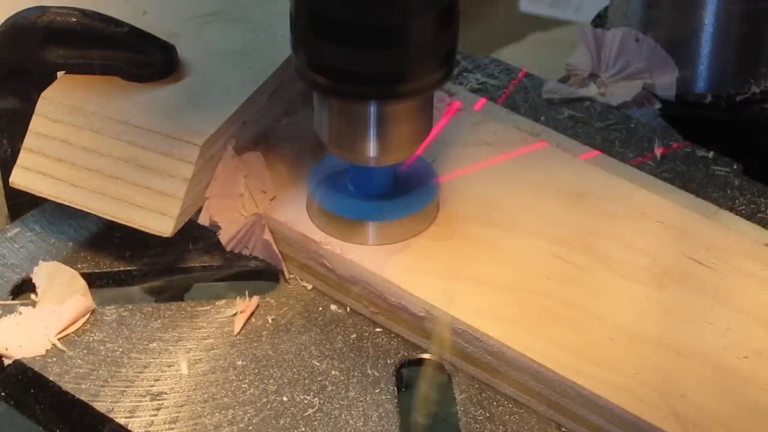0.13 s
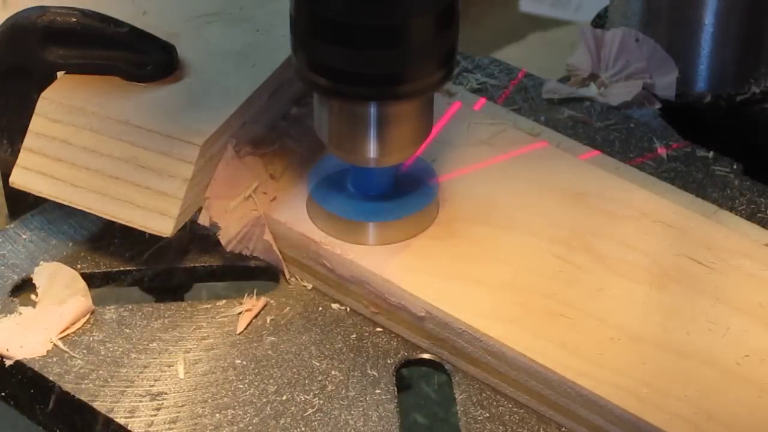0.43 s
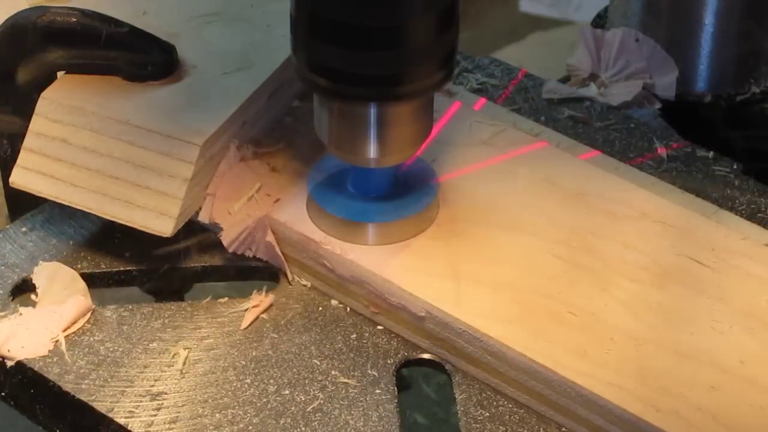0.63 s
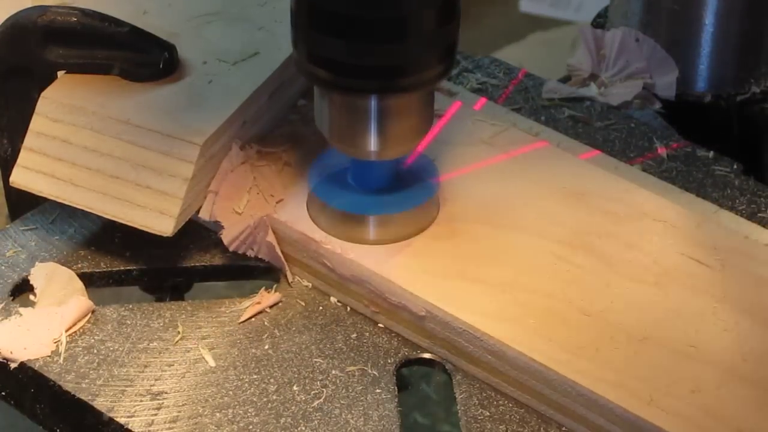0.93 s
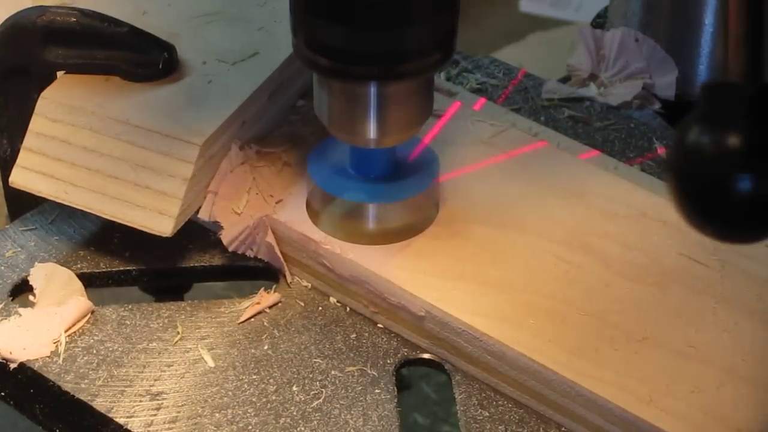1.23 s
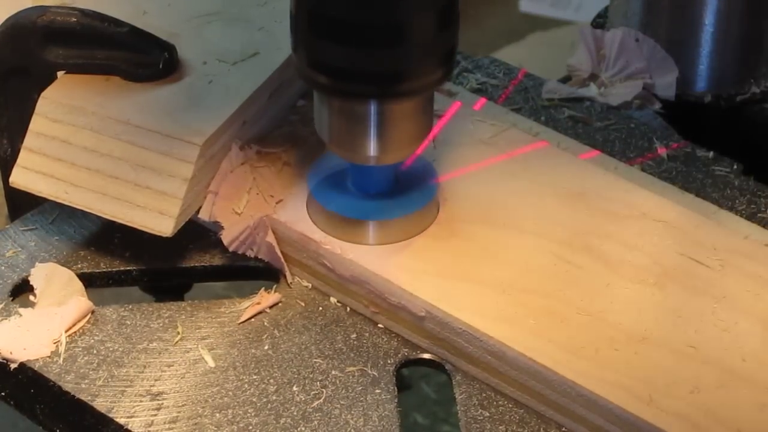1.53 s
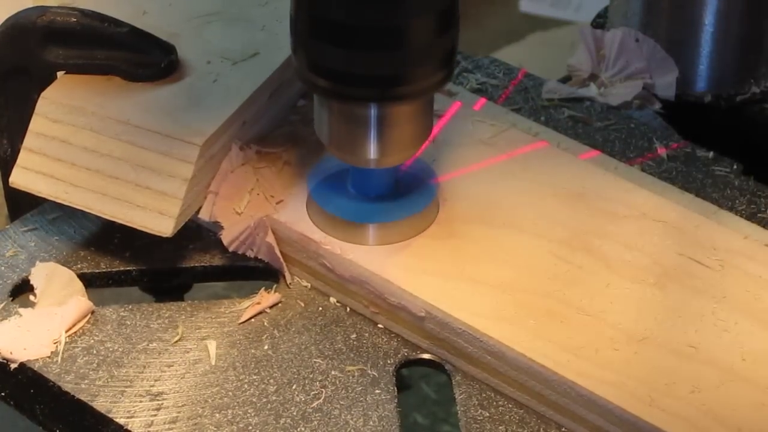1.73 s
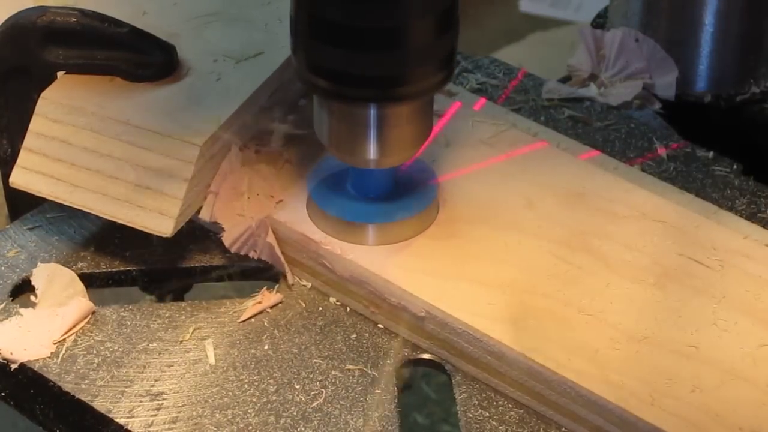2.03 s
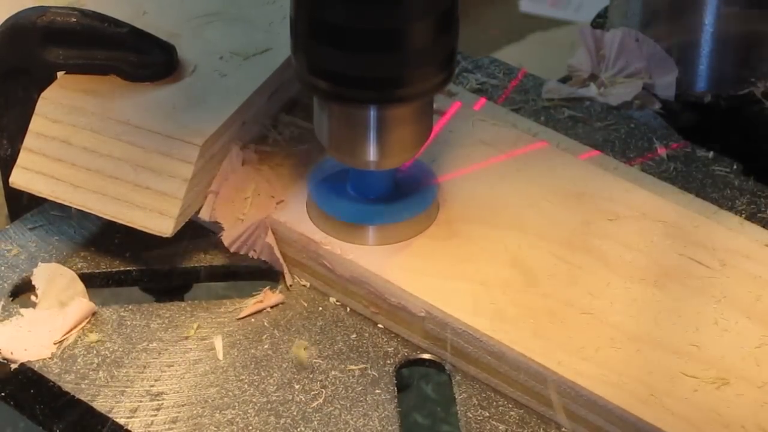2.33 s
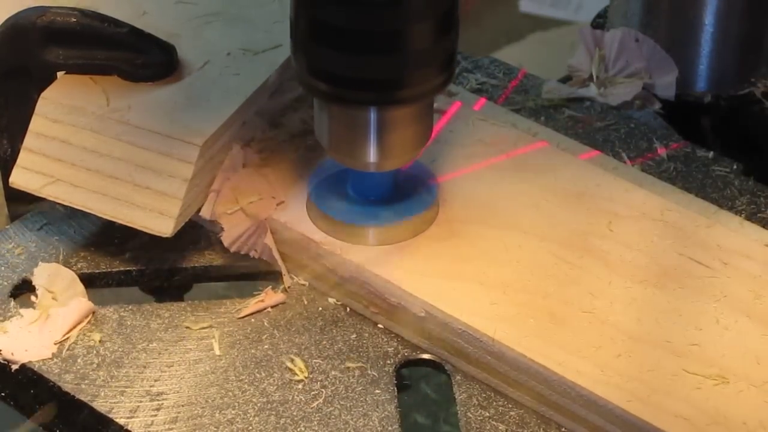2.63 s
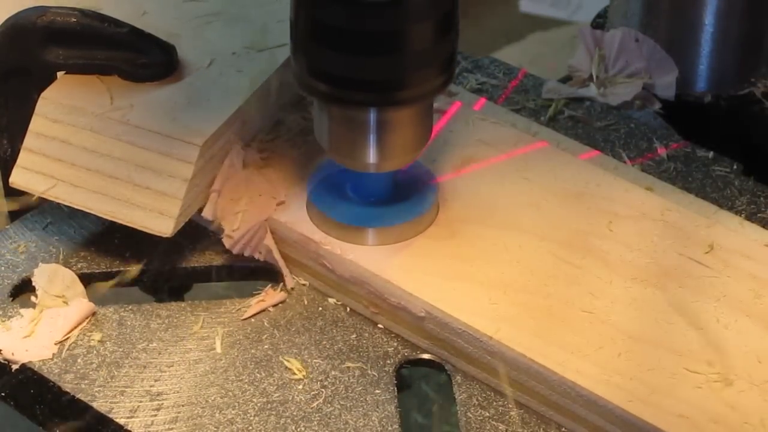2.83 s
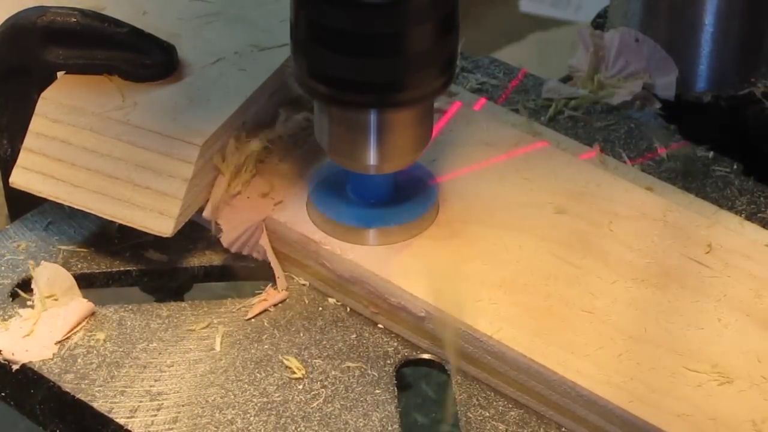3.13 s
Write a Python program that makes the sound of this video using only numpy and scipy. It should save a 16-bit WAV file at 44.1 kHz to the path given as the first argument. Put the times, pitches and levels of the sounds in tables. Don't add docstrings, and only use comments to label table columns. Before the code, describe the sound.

Close, slightly overloaded sound of a wide drill bit cutting wood: harsh fluttering rasp and thin squeals, a brief drop to humming motor, light hissing brushes, then a clattering landing and steady rough cutting in a small room.

```python
import sys
import numpy as np
from scipy import signal
from scipy.fft import rfft, irfft
from scipy.io import wavfile
from scipy.ndimage import uniform_filter1d

SR = 44100
rng = np.random.default_rng(int(sys.argv[2]) if len(sys.argv) > 2 else 0)


def output_pcm(signal):
    pcm = np.clip(np.atleast_2d(signal).T, -1, 1) * 32767
    wavfile.write(sys.argv[1], SR, np.round(pcm).astype(np.int16))


def attenuation_scalar(level_db):
    decades = np.asarray(level_db, float) / 20
    return 10 ** decades


N = 145530

# time in seconds, cutting level in dB.
FEED_PRESSURE = [(0, -23), (.5, -23), (.855, -23), (.88, -30), (.99, -33.5), (1.02, -53), (1.38, -50),
                 (1.4, -53), (1.66, -33), (1.68, -22), (1.8, -23), (2.4, -22.5), (3.3, -23)]
# time in seconds, lag behind a steady pace in grain crossings.
SPINDLE_LAG = [(0, .15), (.075, .05), (.225, -.38), (.375, -.52), (.525, -.59), (.675, -.7), (.83, -.82),
               (1.66, -2.8), (1.87, -3.06), (2.02, -3.13), (2.2, -3.15), (2.5, -3.13), (2.9, -3.04),
               (3.3, -2.99)]
# time in seconds, burst height in dB.
GRAIN_CATCH = [(0, 4), (.3, 4), (.55, 4), (.85, 3), (1.4, 8), (1.66, 5), (1.75, 3), (1.9, 6.5), (2.1, 7),
               (3.3, 6.5)]
# frequency in Hz, level in dB per Hz.
TEAR_COLOUR = [(300, -60), (900, -5), (1450, -15), (2160, -1), (5500, -3), (7000, -9.5), (12000, -23),
               (15900, -39)]
# frequency in Hz, width in Hz, level in dB.
BIT_RINGS = [(1290, 110, -0.5), (1623, 48, -1.5), (2080, 380, 2), (2890, 170, -2.5), (3267, 270, 1),
             (3840, 27, 1.5), (4330, 130, 2.5), (5535, 520, 6), (7520, 50, -3), (9600, 530, -7.5),
             (11300, 430, -5.5), (12200, 740, -6)]
# time in seconds, peak in dB.
SNAPS_BEFORE_LIFT = [(0.0214, -3.5), (0.0425, -11), (0.067, -7), (0.0837, -6.5), (0.1236, -9), (0.1655, -8),
                     (0.196, -11), (0.2114, -6), (0.2583, -8.5), (0.2748, -6), (0.301, -6), (0.3209, -2),
                     (0.3436, -19), (0.3674, -1.5), (0.39, -7.5), (0.41, -6), (0.4357, -8), (0.454, -4),
                     (0.4743, -8.5), (0.4983, -6), (0.521, -4.5), (0.5442, -11), (0.567, -14),
                     (0.5911, -7.5), (0.6322, -8.5), (0.6546, -8), (0.6778, -8), (0.7008, -11), (0.74, -8),
                     (0.7871, -16), (0.8084, -8.5), (0.8324, -13)]
# time in seconds, peak in dB.
LANDING_CHATTER = [
    (1.6735, -7),
    (1.681, -18),
    (1.688, -7),
    (1.696, -16),
    (1.703, -5),
    (1.718, -7),
    (1.725, -8),
]
# time in seconds, peak in dB.
SNAPS_ON_REENTRY = [(1.753, -6), (1.791, -13), (1.8108, -9), (1.8346, -10), (1.8556, -7), (1.875, -18),
                    (1.8984, -5), (1.9204, -20), (1.942, -9), (1.9646, -5.5), (1.9887, -10), (2.01, -6),
                    (2.0324, -10), (2.054, -2), (2.0766, -9), (2.099, -7), (2.121, -2), (2.143, -6),
                    (2.1636, -9), (2.1876, -8), (2.2098, -5.5), (2.2273, -11), (2.2522, -6), (2.2751, -3),
                    (2.2986, -7), (2.321, -7.5), (2.346, -12), (2.369, -14), (2.391, -7), (2.4093, -14),
                    (2.4343, -9), (2.4567, -9), (2.4773, -15)]
# time in seconds, peak in dB.
SNAPS_DEEP_IN_CUT = [(2.478, -22), (2.503, -11), (2.5217, -14), (2.545, -7), (2.568, -3), (2.5911, -13),
                     (2.613, -7), (2.6365, -11), (2.6573, -2.5), (2.6795, -7.5), (2.7033, -7), (2.7258, -8),
                     (2.7476, -8), (2.771, -6), (2.7914, -7), (2.8149, -3.5), (2.837, -6), (2.861, -9),
                     (2.8826, -5.5), (2.9044, -10), (2.9276, -8.5), (2.9503, -14), (2.9735, -6),
                     (2.995, -7), (3.0166, -3), (3.038, -5), (3.062, -10), (3.0859, -10), (3.1046, -6),
                     (3.129, -8), (3.152, -8), (3.1738, -8), (3.1977, -5.5), (3.2193, -12), (3.2391, -9),
                     (3.2675, -14)]
# frequency in Hz, level in dB.
SNAP_COLOUR = [(900, -15), (2000, -1.5), (6000, -0.5), (8000, -4), (13000, -4)]
# frequency in Hz, level in dB.
BOARD_COLOUR = [(60, -50), (110, -49), (200, -21), (350, -2), (700, -4), (1200, -8.5), (2000, -6.5),
                (4000, -47)]
# start and end in seconds, pitch in Hz, dB against the cut.
RIM_SQUEALS = [
    (0, .13, 9010, -17),
    (.6, .66, 10850, -17),
    (.7, .77, 10850, -18),
    (.84, .93, 10850, -17),
    (.55, .9, 11800, -19),
    (0, .97, 7450, -18),
    (.645, .652, 9400, -12),
    (.962, .968, 9400, -4),
    (1.39, 1.5, 7300, -5),
    (1.5, 1.62, 7300, -15),
]
# time in seconds, peak in dB.
RIM_RUBS = [(0.9617, -25), (0.9774, -34), (1.0024, -36), (1.132, -31), (1.1917, -36), (1.281, -32),
            (1.3798, -38), (1.3917, -27.5), (1.4122, -29), (1.434, -24), (1.4546, -28), (1.461, -33),
            (1.4772, -27), (1.491, -35), (1.4994, -33), (1.5085, -35), (1.5184, -28), (1.533, -22),
            (1.552, -31), (1.5624, -28), (1.5754, -25), (1.594, -31), (1.6048, -33), (1.6182, -27),
            (1.6382, -31), (1.6587, -27)]
# frequency in Hz, level in dB.
RUB_COLOUR = [(400, -30), (1500, 13.5), (4000, 13), (7000, 3.5), (11000, 1.5), (14000, -9), (16000, -16)]
# start in seconds, length in seconds, pitch in Hz, level in dB.
BOARD_GROANS = [
    (0.598, 0.057, 1190, -24.5),
    (.72, .1, 950, -29),
    (1.784, .13, 385, -27.5),
    (2.526, .05, 1200, -27),
]
# time in seconds, level in dB.
MOTOR_LEVEL = [(0, -26.5), (.15, -31), (.5, -28), (.85, -24), (.97, -18.5), (1.1, -20), (1.2, -21),
               (1.3, -20), (1.42, -21), (1.52, -20), (1.58, -23), (1.65, -21), (1.75, -24.5), (2.05, -33),
               (2.55, -27.5), (2.65, -29.5), (3.3, -29.5)]
# frequency in Hz, level in dB per Hz.
ROAR_COLOUR = [(15, -76), (25, -42.5), (426, -5.5), (500, -4), (1010, -17), (1360, -15), (2040, -24),
               (4460, -34.5), (15900, -56)]
# frequency in Hz, width in Hz, level in dB.
CASING_RINGS = [(171.5, 34, -13.5), (261, 6.2, -18.5), (329.5, 27, -7), (369.5, 70, 0), (415.4, 19, -10.5),
                (580, 40, -10), (642, 36, -11), (780.5, 12, -9), (839, 77, -6.5), (2470, 240, -16),
                (3390, 780, -11), (4320, 810, -13.5)]
# frequency in Hz, rms level in dB.
HUM_LINES = [(120, -56), (479.5, -25), (720, -34.5), (1250, -39), (1371, -32.5), (1491, -46), (3345, -45)]
# frequency in Hz, width in Hz, dB against the motor.
TABLE_SHUDDER = [(157.8, 5.2, -19), (250.7, 16, -26)]
# frequency in Hz, level in dB.
MIC_RESPONSE = [(20, -7), (105, -6), (125, 0.5), (14000, -3.5), (15900, -9)]


def evened(x):
    return x / np.sqrt(np.mean(x ** 2) + 1e-20)


def curve(points):
    return np.interp(np.arange(N) / SR, *np.transpose(points))


def colour(x, points):
    f, db = np.transpose(points)
    hz = np.fft.rfftfreq(len(x), 1 / SR)
    gain = attenuation_scalar(np.interp(np.log(hz + 1), np.log(f + 1), db))
    return irfft(rfft(x) * gain, len(x))


def ring(x, hz, width):
    r = np.exp(-np.pi * abs(width) / SR)
    pole = r * np.exp(2j * np.pi * hz / SR)
    return 2 * signal.lfilter([1 - r], [1, -pole], x + 0j).real


def double_ring(x, hz, width):
    return evened(ring(ring(x, hz, width), hz, width))


def wander(rate):
    t = np.arange(N) / SR
    drift = np.zeros(N)
    for f in np.geomspace(.05, 1, num=16):
        drift += np.sin(2 * np.pi * (rate * f * t + rng.random())) / np.sqrt(f)
    return evened(drift)


def bursts(table, shape):
    train = np.zeros(N)
    for s, db in table:
        train[np.clip(round(s * SR), 0, N - 1)] = attenuation_scalar(db)
    return signal.oaconvolve(train, shape)[:N] * rng.standard_normal(N)


def edge_force(turn, chance):
    sharpness, skew, vary_db, jitter = 1.5, -.15, .7, .02
    crossing = np.clip(turn, 0, None).astype(int)
    u = turn % 1 - .5 + jitter * chance[crossing, 0]
    bite = np.exp(-sharpness * (1 - np.cos(2 * np.pi * u))) * (1 + skew * np.tanh(4 * u))
    force = attenuation_scalar((curve(GRAIN_CATCH) + vary_db * chance[crossing, 1]) * bite)
    return force / np.sqrt(uniform_filter1d(force ** 2, size=3 * SR // 45))


def tearing_fibres():
    fibres_per_s, spread_db, scrape_share = 6000, 2.6, .55
    strength = attenuation_scalar(spread_db * np.minimum(rng.exponential(1, N), 5))
    fibres = strength * (rng.random(N) < fibres_per_s / SR)
    return evened(fibres * rng.choice([-1., 1.], N)) + scrape_share * rng.standard_normal(N)


def snapping():
    lead_s, peak_s = .008, .0018
    rise_s, fall_s, trim_db = .0023, .0021, -9.5
    crack_s, crack_share = .0004, .7
    t = np.arange(900) / SR - lead_s
    swell = np.exp(np.minimum(t / rise_s, -t / fall_s))
    shape = attenuation_scalar(trim_db) * (swell + crack_share * np.exp(-abs(t) / crack_s))
    snaps = SNAPS_BEFORE_LIFT + LANDING_CHATTER + SNAPS_ON_REENTRY + SNAPS_DEEP_IN_CUT
    return colour(bursts([(s + peak_s - lead_s, db) for s, db in snaps], shape), SNAP_COLOUR)


def grinding():
    level = attenuation_scalar(-8.5 + 0.5 * wander(11.0))
    return level * attenuation_scalar(curve(FEED_PRESSURE)) * evened(colour(rng.standard_normal(N), BOARD_COLOUR))


def cutting():
    crossings_per_s, colour_vary_db, rings_db = 44.7, 4.5, -3
    turn = crossings_per_s * np.arange(N) / SR - curve(SPINDLE_LAG) + .5
    count = np.arange(int(turn.max()) + 3)
    chance = rng.standard_normal((len(count), 2 + len(BIT_RINGS)))
    tear = evened(edge_force(turn, chance) * tearing_fibres())
    drive = attenuation_scalar(curve(FEED_PRESSURE)) * tear + snapping()
    body = np.zeros(N)
    for j, (hz, width, db) in enumerate(BIT_RINGS):
        vary = np.interp(turn, count + .5, chance[:, 2 + j])
        body += attenuation_scalar(db + colour_vary_db * vary) * ring(drive, hz, width) * np.sqrt(200 / abs(width))
    cut = evened(colour(drive, TEAR_COLOUR)) + attenuation_scalar(rings_db) * evened(body)
    return np.std(drive) * cut + grinding()


def squealing():
    width_hz, waver_db, fade_s = 150, 2.5, .012
    t, noise = np.arange(N) / SR, rng.standard_normal(N)
    squeals = np.zeros(N)
    for start, end, hz, db in RIM_SQUEALS:
        fade = np.clip(np.minimum(t - start + fade_s, end + fade_s - t) / fade_s, 0, 1)
        squeals += fade * attenuation_scalar(db + waver_db * wander(50.)) * double_ring(noise, hz, width_hz)
    return attenuation_scalar(curve(FEED_PRESSURE)) * squeals


def rubbing():
    length_s, lead_s, trim_db = .008, .0019, -4
    rim_hz, rim_width_hz, rim_db, sings_from_s = 7300, 90, 11, 1.38
    t = np.arange(900) / SR
    shape = attenuation_scalar(trim_db) * np.sin(np.pi * np.minimum(t / length_s, 1)) ** 2
    puffs = bursts([(s - lead_s, db) for s, db in RIM_RUBS], shape)
    late_puffs = puffs * (np.arange(N) > sings_from_s * SR)
    return colour(puffs, RUB_COLOUR) + attenuation_scalar(rim_db) * ring(late_puffs, rim_hz, rim_width_hz)


def groaning():
    t, noise = np.arange(N) / SR, rng.standard_normal(N)
    groans = np.zeros(N)
    for start, length, hz, db in BOARD_GROANS:
        swell = np.sin(np.pi * np.clip((t - start) / length, 0, 1))
        groans += attenuation_scalar(db) * swell * double_ring(noise, hz, 350)
    return groans


def motor_roar(drive):
    casing_db, lumpy_db = -3.5, 1.8
    casing = np.zeros(N)
    for hz, width, db in CASING_RINGS:
        casing += attenuation_scalar(db + lumpy_db * wander(16.)) * double_ring(drive, hz, 1.36 * width)
    return evened(evened(colour(drive, ROAR_COLOUR)) + attenuation_scalar(casing_db) * evened(casing))


def motor_hum():
    t = np.arange(N) / SR
    hum = np.zeros(N)
    for hz, db in HUM_LINES:
        hum += np.sqrt(2) * attenuation_scalar(db + .6 * wander(12.8)) * np.sin(2 * np.pi * (hz * t + rng.random()))
    return hum


def table_shudder(drive):
    t = np.arange(N) / SR
    tone_share = 1.4
    shudder = np.zeros(N)
    for hz, width, db in TABLE_SHUDDER:
        shudder += attenuation_scalar(db) * (evened(ring(drive, hz, width)) + tone_share * np.sin(2 * np.pi * hz * t))
    return shudder


def motor():
    idle_from_s, idle_to_s, idle_fade_s = .96, 1.705, .04
    loaded_hum_db, hum_ref_db, shudder_top_db = -7, -21, -28.5
    t, level_db = np.arange(N) / SR, curve(MOTOR_LEVEL)
    drive = rng.standard_normal(N) * attenuation_scalar(0.95 * wander(37))
    loaded = np.clip(.5 - np.minimum(t - idle_from_s, idle_to_s - t) / idle_fade_s, 0, 1)
    hum = attenuation_scalar(loaded_hum_db * loaded - hum_ref_db) * motor_hum()
    shudder = attenuation_scalar(np.minimum(level_db, shudder_top_db)) * loaded * table_shudder(drive)
    return attenuation_scalar(level_db) * (motor_roar(drive) + hum) + shudder


def workshop(x):
    t60_s, first_echo_s = 0.22, .004
    t = np.arange(SR // 2) / SR
    tail = rng.standard_normal(len(t)) * attenuation_scalar(-60 * t / t60_s) * (t > first_echo_s)
    return signal.fftconvolve(x, tail / np.linalg.norm(tail))[:N]


def scene():
    near = cutting() + rubbing() + squealing()
    room = attenuation_scalar(-11) * workshop(near)
    return (near + room + motor() + groaning())[None]


def band_limit(x):
    return signal.sosfilt(signal.butter(12, 16020, fs=SR, output="sos"), x)


def record(dry):
    mic = colour(np.tanh(dry[0]), MIC_RESPONSE)
    low_pass = signal.firwin(511, 15750, window=("kaiser", 9), fs=SR)
    mix = signal.oaconvolve(mic[None], low_pass[None], "same")
    return band_limit(mix)


dry = scene()
out = record(dry)
output_pcm(out)
```